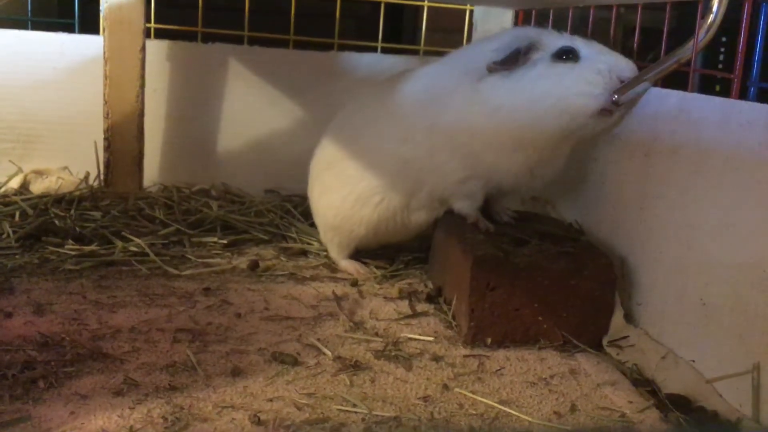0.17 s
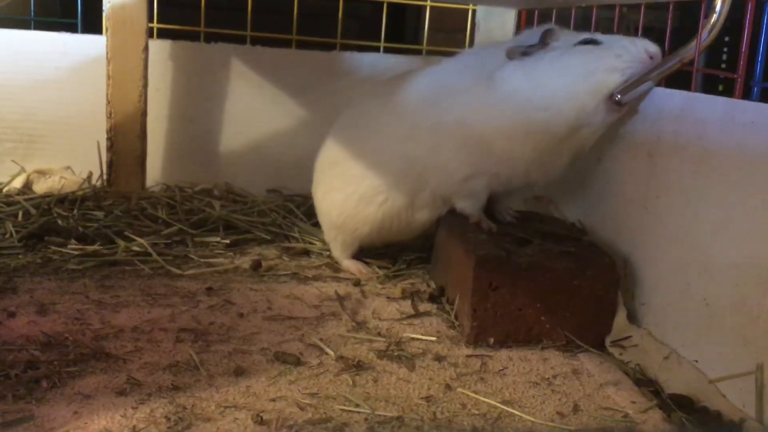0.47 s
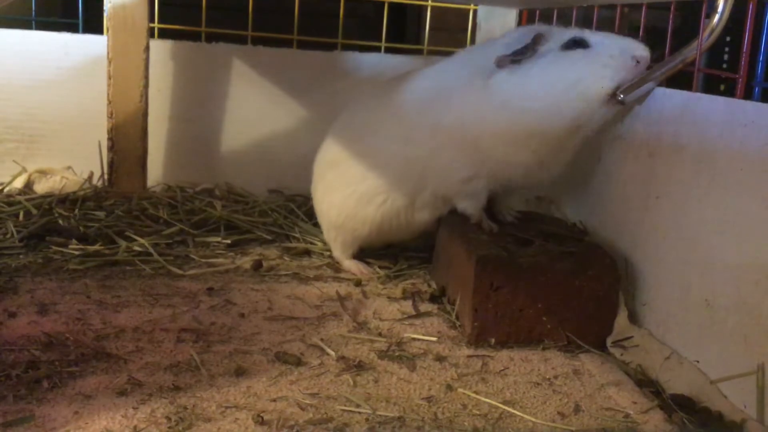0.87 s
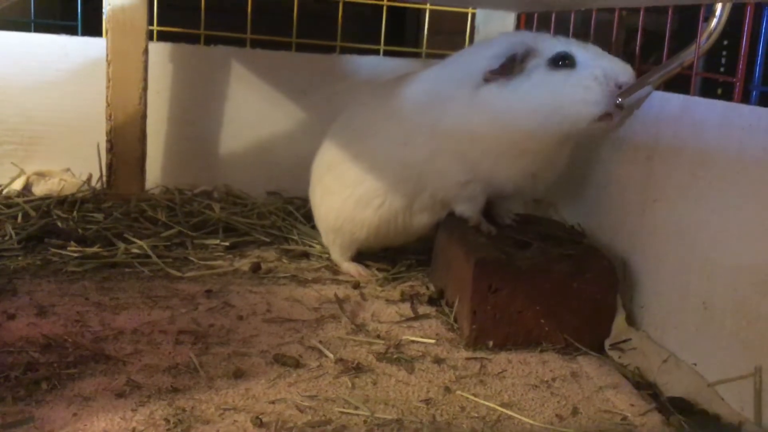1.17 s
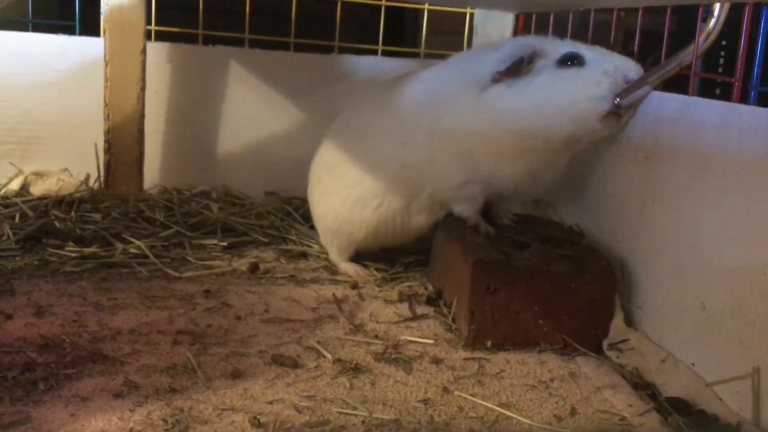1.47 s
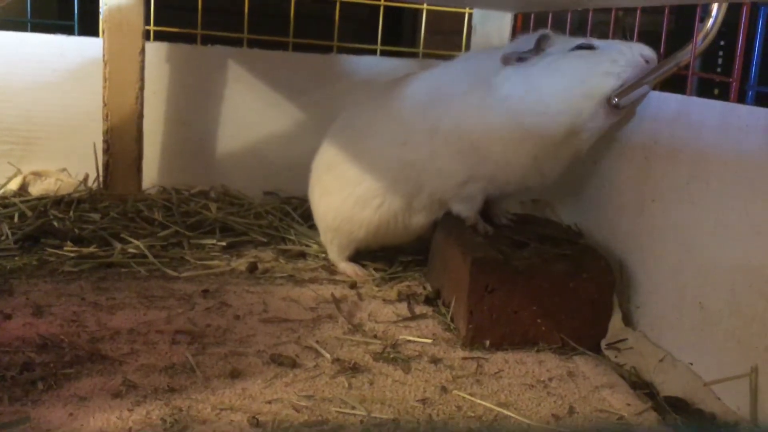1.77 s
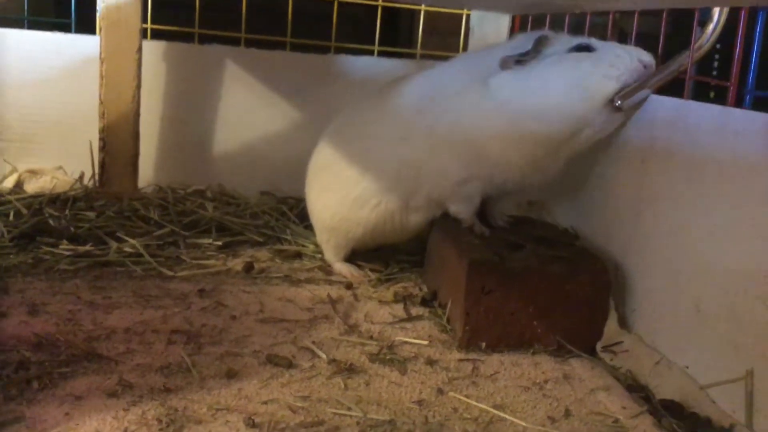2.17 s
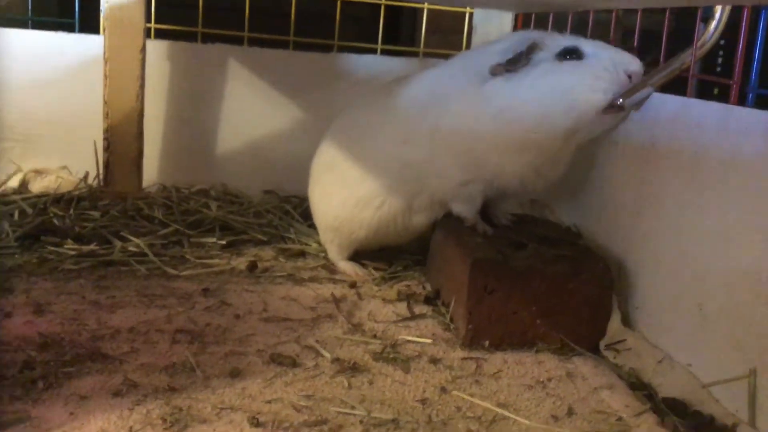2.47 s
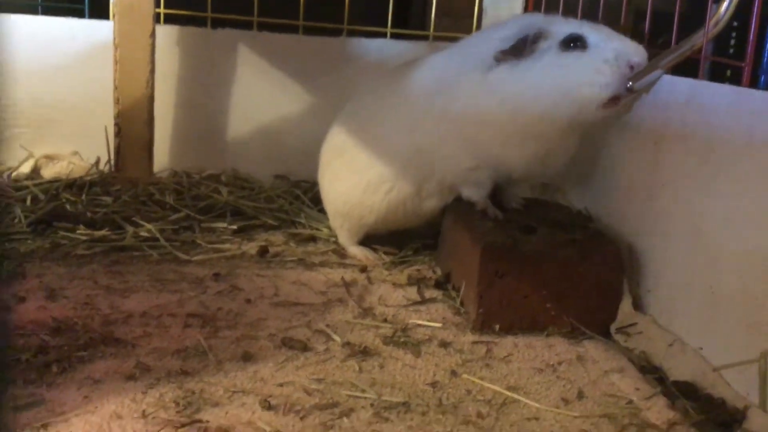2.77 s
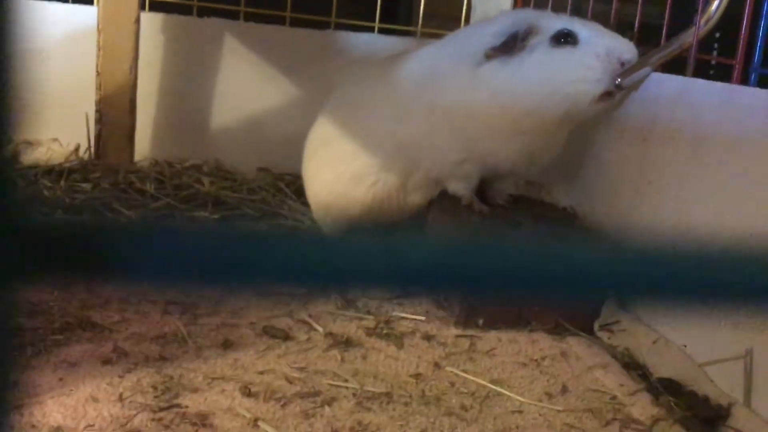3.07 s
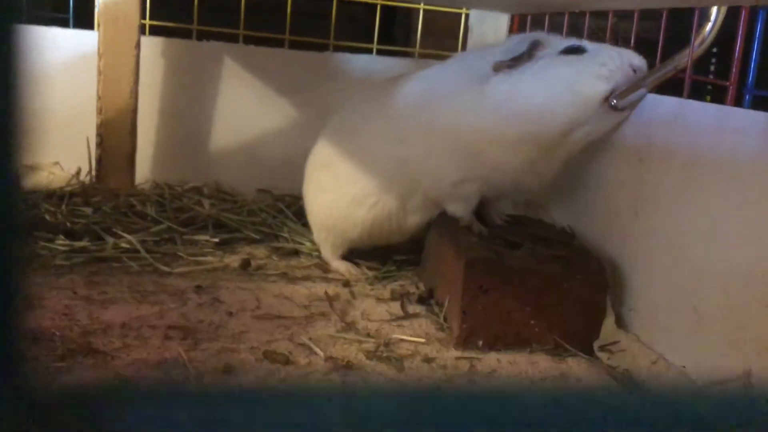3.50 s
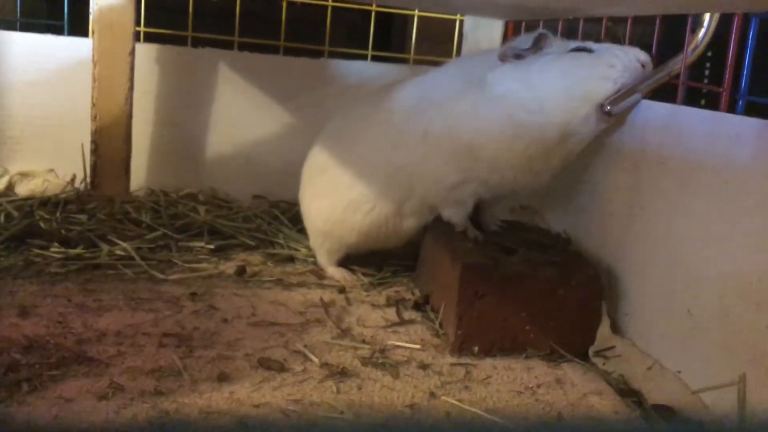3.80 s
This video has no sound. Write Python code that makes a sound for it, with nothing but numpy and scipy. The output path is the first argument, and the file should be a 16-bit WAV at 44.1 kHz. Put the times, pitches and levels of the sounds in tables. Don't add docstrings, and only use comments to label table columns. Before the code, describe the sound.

Metallic ticks and dull bumps as a guinea pig drinks from a bottle, over low machine hum

```python
import sys
import numpy as np
from scipy import signal
from scipy.fft import rfft, irfft, next_fast_len
from scipy.io import wavfile
from scipy.ndimage import map_coordinates

SR = 44100
rng = np.random.default_rng(int(sys.argv[2]) if len(sys.argv) > 2 else 0)


def gain_from_db(level_db):
    decades = np.asarray(level_db, float) / 20
    return 10 ** decades


def unload_wav(signal):
    wavfile.write(
        sys.argv[1],
        SR,
        np.round(np.clip(np.atleast_2d(signal).T, -1, 1) * 32767).astype(np.int16),
    )


N = 173754
TOP_HZ = 15750

SHAFT_HZ = 59.1
SHAFT_ORDERS = [(2, -60), (4, -62.5), (5, -66), (6, -70.5), (9, -75.5), (11, -69.5), (12, -81)]
# time in seconds, level in dB.
ROOM_MODE_LEVEL = [(0.0, -55), (0.48, -69), (0.61, -54), (0.77, -63), (0.83, -51.5), (1.25, -74),
                   (1.33, -64), (2.04, -51.5), (2.36, -57.5), (2.4, -72), (2.7, -58), (3.94, -59.5)]
# frequency in Hz, density in dB per Hz.
RUMBLE_SPECTRUM = [(28, -17), (42, -14.5), (55, 6.5), (100, 15.5), (140, 1.5), (250, -45)]
# time in seconds, level in dB.
RUMBLE_LEVEL = [(0.0, -43), (0.51, -75), (0.54, -54), (0.71, -37.5), (0.73, -71), (0.83, -46), (1.27, -78),
                (1.46, -60), (2.1, -51), (2.17, -60), (2.19, -49.5), (2.58, -52), (2.86, -44.5), (2.9, -56),
                (3.29, -44.5), (3.36, -67), (3.43, -58), (3.94, -68)]
# frequency in Hz, density in dB per Hz.
LOW_AIR_SPECTRUM = [(30, -45.5), (48, 3.5), (80, 5.5), (120, 4), (260, -3), (450, -14), (640, -9.5),
                    (800, -12.5), (950, -40.5)]
# frequency in Hz, density in dB per Hz.
MIDDLE_AIR_SPECTRUM = [(300, -29.5), (850, 3.5), (1200, 1), (2200, -5.5), (2600, -10.5), (3600, -14),
                       (5200, -15.5), (8000, -45)]
# frequency in Hz, density in dB per Hz.
HISS_SPECTRUM = [(4000, -6), (6500, 0), (7700, -3), (9100, 0), (10400, -4), (12500, -6), (14800, -2),
                 (15740, -3)]
# time in seconds, level in dB.
FAN_LEAK_LEVEL = [(0, -96), (3.2, -89), (3.4, -84), (3.65, -79.5), (3.94, -84)]
# time in seconds, level in dB.
FAN_LEVEL = [(0, -73), (.45, -74.5), (.9, -73.5), (1.15, -70.5), (1.45, -72), (2.0, -69.5), (2.3, -71.5),
             (2.7, -72), (2.84, -76), (2.95, -81.5), (3.94, -84)]
# frequency in Hz, width in Hz, level in dB.
HOUSING_RESONANCES = [(5117, 620, 0.5), (3086, 1080, -3), (5860, 1370, -12)]
# frequency in Hz, level in dB relative to the fan's air.
BLADE_TONES = [(3182, -15), (4985, -11.5), (5076, -12), (5120, -12), (5179, -7.5), (5373, -18)]
# start in seconds, level in dB, pitch factor, dullness in dB per octave.
THUMPS = [
    (0.692, -41, 1, -1),
    (.84, -44.5, 0.54, 2),
    (2.076, -39, 1.0, 1.5),
    (2.719, -54, 1.4, 10.5),
    (3.901, -47, 1.03, 4),
]
# frequency in Hz, level in dB, 60 dB decay time in seconds.
WALL_MODES = [(129, -4, 0.4), (213.7, -11.5, 0.65), (240, 1, 0.32), (348, -8.5, 0.15), (596, -18, .35),
              (761, -18.5, 0.49)]
# frequency in Hz, density in dB per Hz.
THUD_SPECTRUM = [(120, -12), (250, 5), (600, -8.5), (1700, -17), (3800, -28), (6500, -37)]
KNOCK_STARTS = [2.095, 3.1773]
# boom of the frame in dB, ring of the bars in dB, hardness in dB.
KNOCK_LEVELS = [
    (-73, -74, -47),
    (-44, -62, 2),
]
# delay after the knock in seconds, level in dB.
REBOUNDS = [
    (0, 2),
    (.0097, 0),
    (.026, -7.5),
]
# frequency in Hz, level in dB, 60 dB decay time in seconds.
FRAME_MODES = [(152.5, 0, 0.42), (273, 4, 0.17), (325, -3, 0.26), (394, -8, 0.46), (541, -8, 0.64),
               (636, -2.5, 0.27), (845, -8.5, 0.33), (1090, -18, 0.34), (1180, -21.5, 0.55),
               (1750, -14, 0.2)]
# frequency in Hz, level in dB, 60 dB decay time in seconds.
BAR_MODES = [(2720, -7, .22), (3526, 0, .22), (3585, -5, .6), (3677, -2.5, .68), (3752, -4, .4),
             (4145, -6, .28), (4242, -5, .34), (4791, -7, .3), (4893, -7, .38), (5351, -7, .42),
             (5600, -7, .5), (5690, -8, .55), (5765, -7, .52), (8737, -22, .6)]
# frequency in Hz, density in dB per Hz.
RATTLE_SPECTRUM = [(150, -17), (600, -4.5), (2000, -23.5), (4500, -21), (6200, -32), (7500, -36),
                   (16000, -44)]
# start in seconds, length in seconds, level in dB, pitch in Hz.
SCRAPES = [(0.546, 0.0073, -73, 9500), (0.662, .025, -77, 5600), (0.691, 0.014, -62, 1700),
           (.714, 0.005, -80, 16000), (2.971, .008, -81, 15000), (.705, 0.035, -84, 8200),
           (0.702, 0.018, -85, 14500), (2.072, 0.004, -60, 4700), (2.073, 0.0089, -62, 2500),
           (2.063, 0.032, -68, 3200), (2.083, .012, -65, 1900), (2.07, .022, -94, 9700),
           (2.084, 0.0054, -84, 8500), (2.083, 0.014, -69, 5200), (2.09, .05, -76, 3300),
           (2.074, .022, -82, 14100), (2.4, .09, -90, 6800), (2.711, 0.11, -85, 7500),
           (2.82, .09, -83, 6400), (2.79, 0.006, -80, 15200), (2.768, .03, -87, 12000),
           (2.875, 0.36, -76, 3500), (2.893, 0.11, -82, 6200), (2.956, .028, -81, 16000),
           (2.955, 0.0082, -73, 6900), (2.969, .022, -93, 10000), (3.18, .058, -84, 14000),
           (3.186, .048, -83, 8700), (3.79, .014, -85, 9000), (3.902, 0.055, -77, 4800),
           (3.918, 0.035, -81, 7600)]
# start in seconds, peak in dB, pitch in Hz, life in cycles.
TICKS = [(.487, -68, 8500, 8), (0.704, -52, 5200, 12), (.704, -68, 8000, 5), (.7105, -54, 5600, 14),
         (.714, -56, 6300, 14), (.7165, -63, 8200, 12), (.775, -70, 9500, 8), (2.0755, -45.5, 5230, 15),
         (2.087, -52, 5200, 7.6), (2.461, -52.5, 3420, 11), (2.568, -59, 5640, 10), (2.590, -59, 7200, 6.5),
         (2.652, -48, 4300, 8.2), (2.668, -52, 4230, 7), (2.690, -70, 13500, 9), (2.7215, -64, 9000, 1.5),
         (2.7272, -69, 14500, 8), (2.7285, -38.5, 2870, 5.2), (2.7287, -44.5, 4700, 4.8),
         (2.729, -45, 1510, 1.4), (2.729, -53, 7300, 2.4), (2.7622, -53, 3400, 7), (2.7625, -61, 5300, 7),
         (2.7705, -70, 13400, 12), (2.7753, -49.5, 3400, 4), (2.7755, -62, 9500, 1.5),
         (2.7875, -55, 3400, 4), (2.7905, -55, 3800, 6), (2.7925, -59, 4700, 7), (2.855, -53.5, 6000, 6.4),
         (2.889, -66, 10000, 2.5), (2.974, -50, 9000, 1.3), (3.004, -56, 3900, 7.9), (3.233, -63, 11000, 4),
         (3.734, -67, 8900, 12), (3.780, -60.5, 8400, 7.7)]
# pitch factor, level in dB, factor on the life in cycles.
TICK_PARTIALS = [(1, 0, 1.2), (1.5, -15, 1.4), (.35, -9, .4), (2.6, -26, 1.2)]


def unit(x):
    return x / np.sqrt(np.mean(x ** 2) + 1e-20)


def curve(rows):
    return np.interp(np.arange(N) / SR, *np.transpose(rows))


def wobble(rate, count=N):
    knots = rng.standard_normal(int(count * rate / SR) + 4)
    return map_coordinates(knots, [np.arange(count) * rate / SR])


def noise(shape, count=N):
    m = next_fast_len(count + 2048)
    f = np.fft.rfftfreq(m, 1 / SR)
    if callable(shape):
        gain = shape(f)
    else:
        hz, db = np.transpose(shape)
        inside = (f > hz[0]) * (f < hz[-1])
        gain = gain_from_db(np.interp(np.log(f + 1), np.log(hz + 1), db)) * inside
    return unit(irfft(rfft(rng.standard_normal(m)) * gain, m)[:count])


def peak(f, hz, width_hz):
    return f * width_hz / np.hypot(hz * hz - f * f, f * width_hz)


def ring(modes, t, pitch, attack_s):
    out = 0
    for hz, db, t60 in modes:
        decay = gain_from_db(db + rng.normal(0, 1) - 60 * t / t60)
        out = out + decay * np.sin(2 * np.pi * (hz * pitch * t + rng.random()))
    return out * (1 - np.exp(-t / attack_s))


def add(track, s, x):
    part = track[round(s * SR):][:len(x)]
    part += x[:len(part)]


def room_air():
    t = np.arange(N) / SR
    rumble = gain_from_db(curve(RUMBLE_LEVEL) - 8) * noise(RUMBLE_SPECTRUM)
    low_air = gain_from_db(-52 + 1.18 * wobble(3.914)) * noise(LOW_AIR_SPECTRUM)
    middle_air = gain_from_db(-67.5 + wobble(4.37)) * noise(MIDDLE_AIR_SPECTRUM)
    hiss = gain_from_db(-87 + 0.6 * wobble(4)) * noise(HISS_SPECTRUM)
    camera_whine = gain_from_db(-101.5) * np.sin(2 * np.pi * 9000 * t)
    return rumble + low_air + middle_air + hiss + camera_whine


def compressor():
    t = np.arange(N) / SR
    hum = np.zeros(N)
    for k, db in SHAFT_ORDERS:
        level = gain_from_db(db + 1.5 + 3 * wobble(7))
        drift_rad = 1.4 * wobble(8) + k * k
        hum += level * np.sin(2 * np.pi * k * SHAFT_HZ * t + drift_rad)
    mode_level = gain_from_db(curve(ROOM_MODE_LEVEL) + 2 + 2.3 * wobble(8.79))
    return hum + mode_level * np.sin(2 * np.pi * SHAFT_HZ * t + 1.2 * wobble(8))


def fan():
    t = np.arange(N) / SR

    def housing(f):
        return sum(gain_from_db(db) * peak(f, hz, width_hz) ** 3 for hz, width_hz, db in HOUSING_RESONANCES)

    air = noise(housing) * gain_from_db(1.5 * wobble(90))
    tones = np.zeros(N)
    for hz, db in BLADE_TONES:
        tones += gain_from_db(db + 2.5 * wobble(9)) * np.sin(2 * np.pi * hz * t + 1.5 * wobble(12))
    gusts_db = 0.6 * wobble(8.07)
    direct = gain_from_db(curve(FAN_LEVEL) - 0.5 + gusts_db) * (air + tones)
    leak = gain_from_db(curve(FAN_LEAK_LEVEL)) * noise(lambda f: peak(f, 4930, 950) ** 2)
    return direct + leak


def bottle_thumps():
    out, t = np.zeros(N), np.arange(SR // 2) / SR
    attack_s, thud_t60_s = 0.0077, 0.22
    reference_hz = WALL_MODES[2][0]
    for s, db, pitch, dull_db in THUMPS:
        modes = [(hz, level - dull_db * np.log2(hz / reference_hz), t60) for hz, level, t60 in WALL_MODES]
        thud = noise(THUD_SPECTRUM, len(t)) * gain_from_db(-9 - 60 * t / thud_t60_s)
        thud *= 1 - np.exp(-t / attack_s)
        add(out, s, gain_from_db(db) * (ring(modes, t, pitch, attack_s) + thud))
    return out


def fluttering_ring(modes, t, attack_s, flutter_db, rate):
    return sum(ring([mode], t, 1, attack_s) * gain_from_db(flutter_db * wobble(rate, len(t))) for mode in modes)


def cage_knocks():
    out, t = np.zeros(N), np.arange(SR // 2) / SR
    rattle_t60_s, crack_t60_s = 0.26, 0.012
    for s, (boom_db, ring_db, hard_db) in zip(KNOCK_STARTS, KNOCK_LEVELS):
        decay = gain_from_db(-52 - 60 * t / rattle_t60_s) + gain_from_db(-49 - 60 * t / crack_t60_s)
        rattle = noise(RATTLE_SPECTRUM, len(t)) * decay
        bars = fluttering_ring(BAR_MODES, t, 0.006, 4.5, 150)
        add(out, s, gain_from_db(ring_db) * bars + gain_from_db(hard_db) * rattle)
        for after_s, db in REBOUNDS:
            boom = fluttering_ring(FRAME_MODES, t, 0.0009, 2, 42.6)
            add(out, s + after_s, gain_from_db(boom_db + db - 3) * boom)
    return out


def spout_scrapes():
    out, count = np.zeros(N), SR // 8
    for s, length_s, db, hz in SCRAPES:
        burst = noise(lambda f: peak(f, hz, 0.55 * hz) ** 3, count)
        burst *= gain_from_db(3 * wobble(234, count))
        u = np.clip(np.arange(count) / SR / length_s, 0, 1)
        envelope = np.abs(np.sin(np.pi * u)) ** 0.11 * (u < 1)
        add(out, s, gain_from_db(db) * unit(burst) * envelope)
    return out


def spout_ticks():
    out, t = np.zeros(N), np.arange(SR // 40) / SR
    echo_s, echo_db = 0.0021, -19
    for s, db, hz, cycles in TICKS:
        tick = np.zeros(len(t))
        for factor, level, more in TICK_PARTIALS:
            if hz * factor < TOP_HZ:
                rise_s = 0.25 * cycles * more / (hz * factor)
                envelope = (t / rise_s * np.exp(1 - t / rise_s)) ** 2
                tick += gain_from_db(level) * envelope * np.sin(2 * np.pi * (hz * factor * t + rng.random()))
        tick /= np.abs(tick).max()
        add(out, s, gain_from_db(db) * tick)
        add(out, s + echo_s, gain_from_db(db + echo_db) * tick)
    return out


def scene():
    background = room_air() + compressor() + fan()
    cage = bottle_thumps() + cage_knocks()
    spout = spout_scrapes() + spout_ticks()
    return (background + cage + spout)[None]


def roll_off(x):
    return signal.sosfilt(signal.butter(12, 16110, fs=SR, output="sos"), x)


def record(dry):
    m = next_fast_len(N + 2048)
    passband = np.fft.rfftfreq(m, 1 / SR) < TOP_HZ
    mix = irfft(rfft(dry, m) * passband, m)[:, :N]
    return roll_off(mix)


dry = scene()
out = record(dry)
unload_wav(out)
```